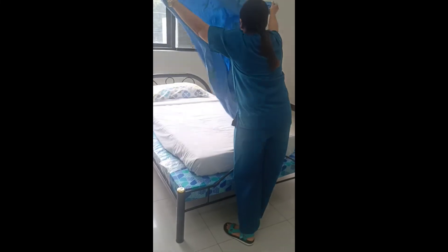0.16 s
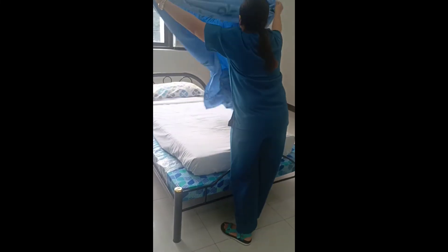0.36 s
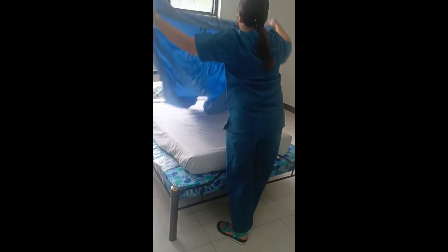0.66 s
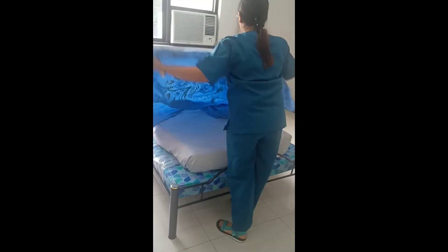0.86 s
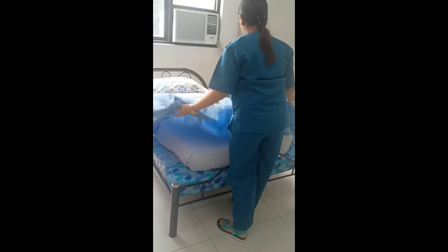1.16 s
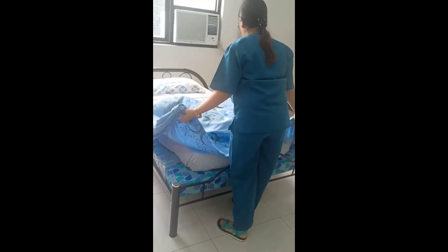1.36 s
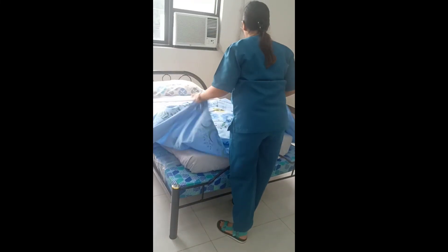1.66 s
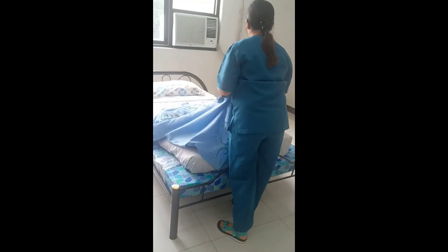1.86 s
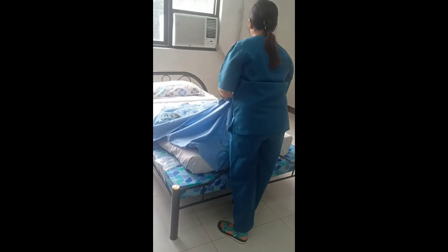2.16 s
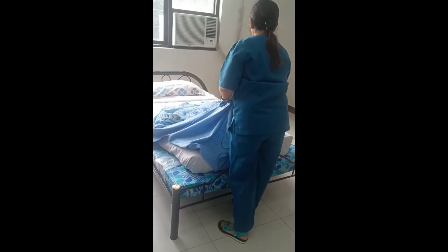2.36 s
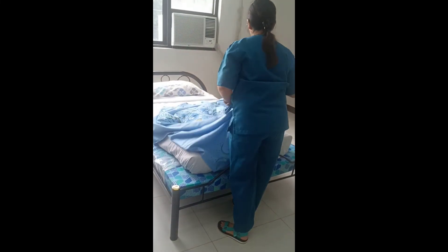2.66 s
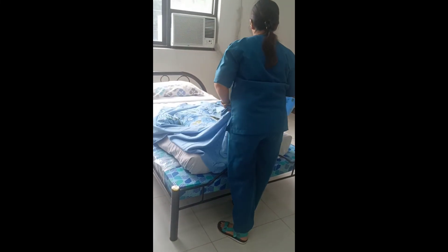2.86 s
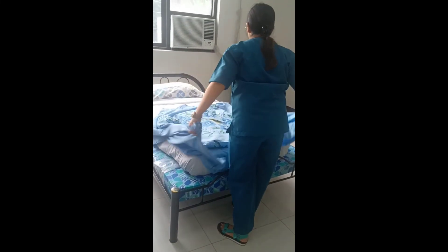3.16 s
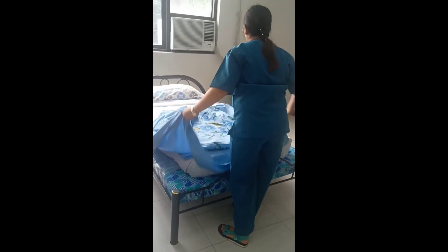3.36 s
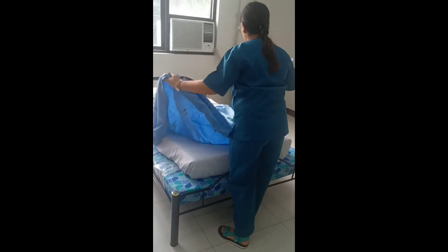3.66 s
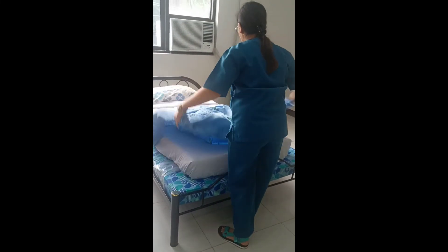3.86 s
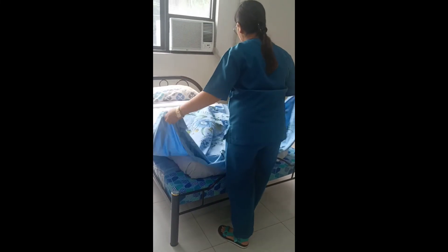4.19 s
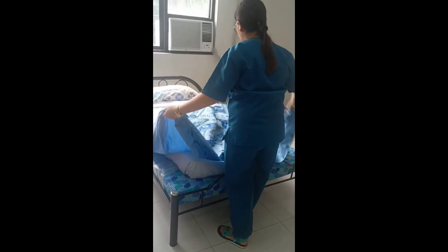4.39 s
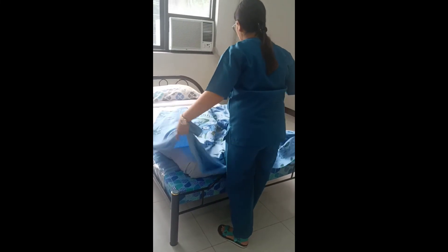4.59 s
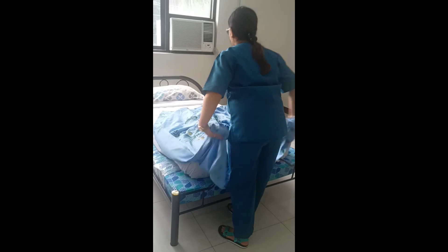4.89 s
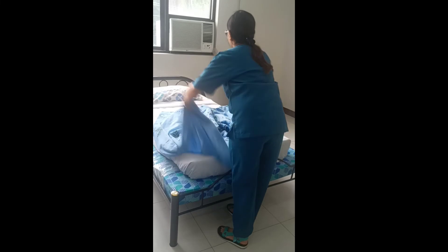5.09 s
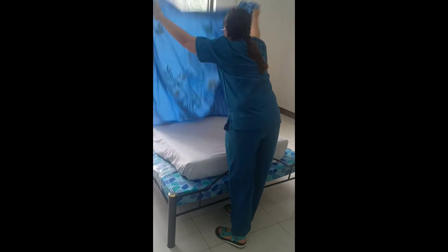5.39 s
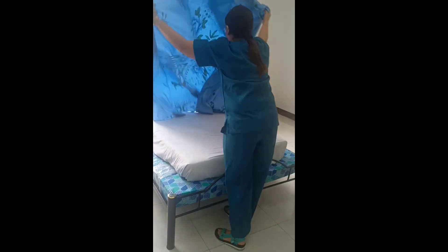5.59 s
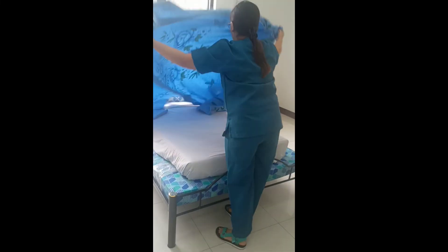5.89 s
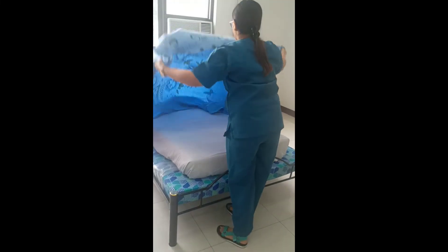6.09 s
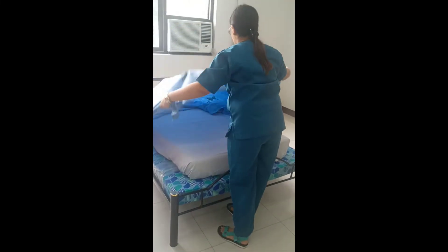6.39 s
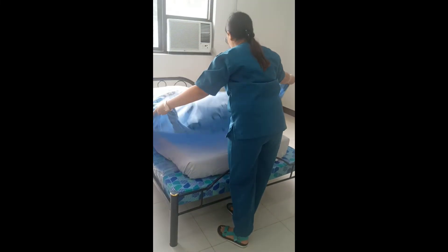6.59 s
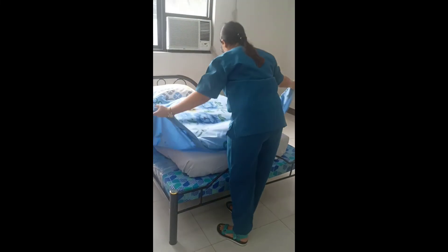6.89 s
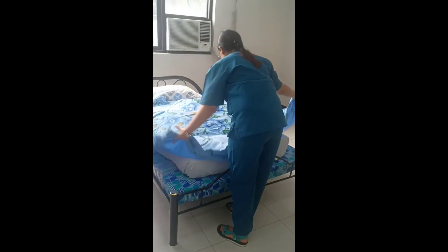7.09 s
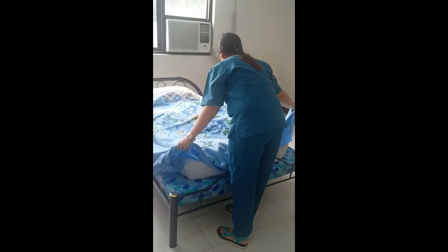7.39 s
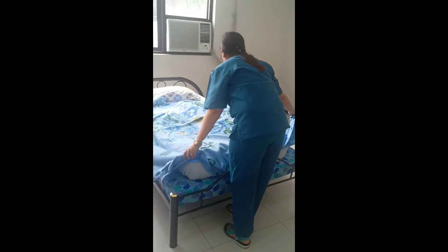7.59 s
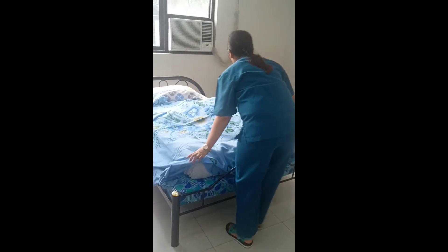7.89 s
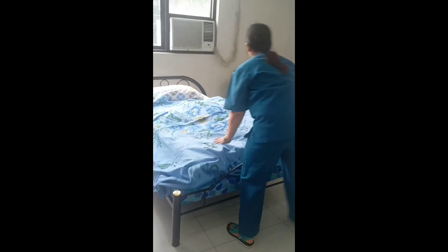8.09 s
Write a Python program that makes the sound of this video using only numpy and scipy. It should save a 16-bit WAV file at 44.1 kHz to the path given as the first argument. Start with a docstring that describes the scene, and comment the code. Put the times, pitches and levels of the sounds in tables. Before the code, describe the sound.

Four evenly spaced vibration buzzes dominate, each starting with a sharp tick and a quick rise, holding a low hum with thin bright whine, and falling away in a short rattling slide. In the gaps one hears the constant fan rush and compressor hum of an air conditioner, faint cloth hiss as a sheet is spread, small clicks and a light metal jingle. The room is small and reflective, the motor pressed against the microphone.

```python
"""In a tiled room an air conditioner drones: noise-fed room modes, fan rush and compressor multiples.
A bed sheet rustles as grainy hiss; rotor, casing and cloth tick in short noise bursts.
Something metallic clinks and a frame is bumped, both as decaying sine modes with a room tail.
A tiny unbalanced motor, pressed against the microphone's casing, runs about one second in every two:
it ticks, spins up, buzzes with a comb of shaft orders and brush hiss, and coasts down."""
import sys
import numpy as np
from scipy import signal
from scipy.fft import rfft, irfft, next_fast_len
from scipy.io import wavfile
from scipy.ndimage import uniform_filter1d, map_coordinates

SR = 44100
rng = np.random.default_rng(int(sys.argv[2]) if len(sys.argv) > 2 else 0)


def transcribe(u):
    """Save the signal u as a 16-bit wav file named by the first command-line argument.

    u: samples, shape (n,) or (channels, n), limited to [-1, 1]; the rate is SR.
    q: integer samples, one column per channel.
    """
    v = np.clip(np.atleast_2d(u).T, -1, 1)
    q = np.round(v * 32767).astype(np.int16)
    wavfile.write(sys.argv[1], SR, q)


N = 363825
TOP_HZ = 15650  # band limit

# motor current bursts: on_s, off_s, reference_level_db
CURRENT = [(.445, 1.427, -23), (2.445, 3.427, -23), (4.445, 5.427, -23), (6.445, 7.43, -23.5)]


def amp(db):
    """Gain of a level in dB."""
    return 10 ** (np.asarray(db) / 20)


def unit(x):
    """x at rms 1."""
    return x / np.sqrt(np.mean(x ** 2) + 1e-20)


def along(points, hz):
    """Interpolate (Hz, value) points on a log frequency axis."""
    point_hz, value = np.transpose(points)
    return np.interp(np.log(hz + 1), np.log(point_hz + 1), value)


def curve(rows):
    """One value per sample from rows of (s, value)."""
    point_s, value = np.transpose(rows)
    return np.interp(np.arange(N) / SR, point_s, value)


def wobble(rate_hz):
    """Smooth random curve with rate_hz knots a second."""
    knots = rng.standard_normal(int(N * rate_hz / SR) + 4)
    return map_coordinates(knots, [np.arange(N) * rate_hz / SR])


def random_phase():
    """Uniform starting phase in radians."""
    return rng.uniform(0, 2 * np.pi)


def filtered(x, response):
    """Multiply the spectrum of x by a response of frequency."""
    size = next_fast_len(len(x) + 8192)
    return irfft(rfft(x, size) * response(np.fft.rfftfreq(size, 1 / SR)), size)[:len(x)]


def rush(spectrum, patchy_db):
    """Coloured noise of rms 1 with time-frequency patches of random gain."""
    z = signal.stft(rng.standard_normal(N), nperseg=512)[2]
    field = uniform_filter1d(rng.standard_normal(z.shape), size=6, axis=0)
    field = uniform_filter1d(field, size=12, axis=1)
    noise = signal.istft(z * amp(patchy_db * unit(field)), nperseg=512)[1][:N]
    return unit(filtered(noise, lambda hz: amp(along(spectrum, hz))))


def room_tail():
    """Fresh reverberant noise of energy 1; each frequency dies at its own speed."""
    # room decay: frequency_hz, t60_s
    decay = [(1000, 0.44), (5000, 0.5), (15000, 0.045)]
    hz, t, z = signal.stft(rng.standard_normal(SR // 2), SR, nperseg=256)
    fade = amp(-60 * t / along(decay, hz)[:, None])
    tail = signal.istft(z * fade, SR, nperseg=256)[1]
    return tail / np.linalg.norm(tail)


def add(track, start_s, sound):
    """Mix a sound into the track at start_s."""
    part = track[round(start_s * SR):][:len(sound)]
    part += sound[:len(part)]


def struck(blows, modes, wet_db, grit):
    """Each blow rings the modes at new strengths; chatter roughens the ring and the room answers."""
    out, t = np.zeros(N), np.arange(SR // 2) / SR
    for start_s, blow_db in blows:
        ring = np.zeros(len(t))
        for hz, level_db, t60_s in modes:
            decay = amp(blow_db + level_db + rng.normal(0, 1.1) - 60 * t / t60_s)
            struck_hz = hz * rng.normal(1, 0.0075)
            ring += decay * np.sin(2 * np.pi * struck_hz * t + random_phase())
        ring *= 1 - np.exp(-t / 0.00067)  # onset
        ring *= 1 + grit * wobble(925)[:len(t)]
        add(out, start_s, ring)
        add(out, start_s, amp(wet_db) * signal.fftconvolve(ring, room_tail()))
    return out


def air_conditioner():
    """Fan rush, the room's low modes excited by noise and multiples of the compressor's shaft."""
    # fan rush spectrum: frequency_hz, relative_density_db (per Hz)
    fan_spectrum = [(15, -50), (45, -13), (75, -11), (125, -5), (240, -3), (320, -7.5), (500, -10),
                    (900, -16), (1100, -22.5), (1600, -21), (2500, -29), (4000, -26), (7300, -34.5),
                    (9500, -45), (13500, -41), (15900, -40)]
    # room modes under the fan: centre_hz, width_hz, level_db
    low_modes = [(124.4, 13.7, -42), (175.7, 11, -41.5), (217, 23, -49.5), (242.9, 6.7, -43.5),
                 (352.3, 23, -47.5), (491, 25, -52.5)]
    # compressor tones: multiple_of_shaft, level_db
    multiples = [(2, -47.5), (3, -43.5), (4, -49), (6, -40), (8, -46), (10, -45)]
    compressor_hz = 29.36
    angle = 2 * np.pi * np.cumsum(compressor_hz * (1 + 0.003 * wobble(1.492))) / SR
    out = np.zeros(N)
    for k, level_db in multiples:
        out += amp(level_db + wobble(5.6)) * np.sin(k * angle + random_phase())
    for centre_hz, width_hz, level_db in low_modes:
        resonance = lambda hz: 1 / (1 + ((hz - centre_hz) / width_hz * 2) ** 2)
        out += amp(level_db) * unit(filtered(rng.standard_normal(N), resonance))
    return out + amp(-35.5 + 0.69 * wobble(2.09)) * rush(fan_spectrum, patchy_db=1)


def sheet():
    """Sliding cloth: a coloured hiss whose level swells and flutters."""
    # rustle level: time_s, level_db
    rustle = [(0, -49.5), (.18, -43.5), (.42, -52.5), (1.68, -51.5), (1.82, -42.5), (2.2, -58.5),
              (2.42, -51), (3.55, -53), (3.7, -43.5), (3.88, -57), (4.2, -54), (4.27, -44), (4.41, -47.5),
              (5.7, -55), (5.99, -58), (6.26, -48), (6.4, -52.5), (7.6, -45.5), (7.86, -47.5), (8.12, -54),
              (8.25, -49)]
    # cloth spectrum: frequency_hz, relative_density_db (per Hz)
    cloth_spectrum = [(900, -40), (1500, -12), (2800, -2), (4000, -2), (5800, -5), (7500, -1.5),
                      (10000, -14), (12200, -8.5), (13800, -3), (16000, -13)]
    return amp(curve(rustle) + 1.2 * wobble(40)) * rush(cloth_spectrum, patchy_db=1)


def bumped_frame():
    """Bumps ring the frame's low, short modes."""
    # bumps: start_s, level_db
    bumps = [(.803, -40.5), (.84, -48.5), (.875, -47)]
    # frame modes: frequency_hz, relative_level_db, t60_s
    frame_modes = [(780, -4, .08), (880, -1, .12), (1080, -4, .06), (1250, 2, .14), (1480, -5, .12),
                   (1700, -11, .07), (2000, -9, .07), (2550, -8, .06)]
    return struck(bumps, frame_modes, wet_db=2.5, grit=0.95)


def metal_clinks():
    """Blows ring the high modes of something small and metallic."""
    # clinks: start_s, level_db
    clinks = [(6.005, -45), (6.03, -47), (6.055, -50), (6.08, -52), (6.12, -53)]
    # metal modes: frequency_hz, relative_level_db, t60_s
    metal_modes = [(4630, -11, .08), (5050, -4, 0.06), (5360, -2.5, 0.08), (6060, -6, .1), (6210, -10, .1),
                   (6800, -3.5, .14), (7200, -5, .08), (7900, -3, .08), (8660, -9, 0.086), (9100, -7, .08),
                   (10400, -10, .1), (11300, -7, 0.11), (11550, -8, .14), (13700, -8, .06)]
    return struck(clinks, metal_modes, wet_db=6, grit=1.06)


def ticks():
    """Millisecond cracks of decaying noise, each with its own band and share of room."""
    # ticks of rotor, casing and cloth: start_s, dry_peak_db, low_hz, high_hz, room_tail_db (re crack)
    cracks = [(.44, -23.5, 7000, 14000, 0), (.445, -20, 3500, 14000, -6), (.458, -30, 7000, 13000, -10),
              (1.62, -31, 5000, 11000, -12), (1.656, -34, 7000, 15000, -12), (2.057, -35, 11000, 16000, -6),
              (2.442, -20, 6950, 14000, -12), (2.46, -29, 7000, 15000, -10), (2.469, -20, 4500, 11000, -15),
              (3.622, -33, 6500, 9000, -12), (3.633, -33, 7000, 13000, -12), (4.24, -20.5, 3800, 16000, 7),
              (4.342, -28, 6000, 16000, -8), (4.421, -32, 6000, 15000, 1), (4.444, -13.5, 6300, 16000, 3),
              (4.447, -13.5, 6300, 16000, -5), (4.457, -21, 4000, 16000, 7), (4.474, -28, 11000, 16000, -4),
              (5.633, -21, 7500, 16000, -7), (6.005, -27, 4500, 14000, 0), (6.205, -25.5, 11500, 16000, 3),
              (6.39, -38, 11000, 16000, -1), (6.449, -25, 7500, 15000, -12),
              (6.454, -15.5, 7500, 14900, -12), (7.635, -29, 7500, 16000, -12),
              (7.81, -31, 3480, 15000, 10.5), (7.822, -30.5, 3620, 7040, 11.5)]
    out, t = np.zeros(N), np.arange(SR // 50) / SR
    for start_s, peak_db, low_hz, high_hz, tail_db in cracks:
        band = signal.butter(3, [low_hz, high_hz], "bandpass", fs=SR, output="sos")
        crack = signal.sosfilt(band, amp(-60 * t / .003) * rng.standard_normal(len(t)))
        crack *= amp(peak_db) / np.abs(crack).max()
        add(out, start_s, crack)
        tail = signal.sosfilt(band, room_tail())
        tail /= np.sqrt(2 * (high_hz - low_hz) / SR)  # make up for the energy outside the band
        add(out, start_s, amp(tail_db) * np.linalg.norm(crack) * tail)
    return out


def shaft_speed():
    """Shaft speed in Hz: each burst closes in on the free speed, then runs down without current."""
    # settling speed, drifting with load and supply: time_s, speed_hz (turns per second)
    free_speed = [(.6, 247.4), (1.05, 247.7), (1.2, 246.8), (1.4, 247.3), (2.7, 242.2), (2.98, 245.6),
                  (3.16, 244.6), (3.27, 246.6), (3.43, 244.2), (4.7, 241.6), (4.92, 242.2), (5.09, 244.4),
                  (5.43, 239.8), (6.7, 239.6), (7, 239.8), (7.32, 241.2)]
    breakaway_s = .028  # wait before the rotor turns
    spin_up_s, coast_s = .058, .13  # time constants
    t, share = np.arange(N) / SR, np.zeros(N)
    for on_s, off_s, _ in CURRENT:
        run_up = 1 - np.exp(-np.clip(t - on_s - breakaway_s, 0, None) / spin_up_s)
        run_down = np.exp(-np.clip(t - off_s, 0, None) / coast_s)
        share += run_up * run_down
    return np.maximum(share * curve(free_speed), 1)


def motor():
    """The off-centre weight shakes once a turn; brushes and bearings add overtones and hiss."""
    # shaft orders: multiple, relative_level_db (the first, the shake, is made apart)
    orders = [(1, 0), (2, -37), (3, -42), (4, -48), (5, -30), (6, -33), (7, -39), (8, -39), (9, -46),
              (10, -30), (11, -34), (12, -27), (13, -50), (14, -41), (15, -40), (16, -41), (17, -51),
              (18, -43), (19, -39), (20, -35), (21, -42), (22, -30), (23, -27), (24, -31), (25, -38),
              (26, -41), (27, -37), (28, -45), (29, -36), (30, -31), (31, -33), (32, -32), (33, -33),
              (34, -28), (35, -37), (36, -33), (37, -36), (38, -38), (39, -40), (40, -37), (41, -46),
              (42, -39), (43, -43), (44, -34), (45, -36), (46, -33), (47, -34), (48, -33), (49, -40),
              (50, -42), (51, -39), (52, -44), (53, -36), (54, -36), (55, -44), (56, -36), (57, -34),
              (58, -41), (59, -42), (60, -45), (61, -47), (62, -33), (63, -50)]
    # brush hiss spectrum: frequency_hz, relative_density_db (per Hz)
    brush_spectrum = [(900, -120), (1500, -3), (3000, -9), (5500, -2), (6750, -7.5), (7700, 0.5),
                      (10000, -7), (12000, -4), (13800, -2), (16000, -8.5)]
    # casing colour: frequency_hz, gain_db
    casing = [(200, 0), (1200, 0), (2100, 2), (2900, 0), (4300, -8), (5300, 0), (6100, 2), (6750, -9),
              (7500, 0), (8300, 1), (10000, -4), (11500, -1), (12700, -5), (13800, 0), (16000, 0)]
    full_hz = 245
    t, speed = np.arange(N) / SR, shaft_speed()
    slack = np.clip(1 - speed / full_hz, 0, 1) ** .5  # below full speed the rotor runs loose in its bearings
    angle = 2 * np.pi * np.cumsum(speed) / SR
    play = (.0007 + .045 * slack ** 1.3) * wobble(300)  # shaft angle jitter, rad
    out, hiss = np.zeros(N), rush(brush_spectrum, patchy_db=3.0)
    for on_s, off_s, reference_db in CURRENT:
        span = slice(round(on_s * SR), round((off_s + 0.22) * SR))
        u, turn, turn_hz = t[span], angle[span], speed[span]
        octaves = np.log2(turn_hz / full_hz)
        since_off_s = u - off_s
        edges = np.clip((u - on_s) / 0.014, 0, 1) * np.clip((off_s + 0.21 - u) / .03, 0, 1)

        # shaking force grows with speed and drops when the current is cut
        coasting = np.clip(since_off_s / 0.098, 0, 1)
        shake = amp(reference_db + 3.0 + 9.7 * octaves - 2 * coasting) * np.sin(turn)

        whine = np.zeros(len(u))
        for k, level_db in orders[1:]:
            # away from full speed an overtone meets another part of the casing's colour
            moved_db = along(casing, k * turn_hz) - along(casing, k * full_hz)
            gain = amp(level_db + moved_db + rng.normal(0, 1) + wobble(4.06)[span])
            gain = gain * (k * turn_hz < TOP_HZ)
            whine += gain * np.sin(k * (turn + play[span]) + random_phase())
        whine *= amp(reference_db + 3.5 + 8 * octaves - 12 * np.clip(since_off_s / .018, 0, 1))

        # loose rotor rattles twice a turn; flares when the current is cut, then fades
        beat = np.exp(.5 * np.cos(2 * turn))
        released_db = (u > off_s) * (9 - 26 * np.clip(since_off_s / 0.14, 0, 1))
        rattle_db = reference_db - 35 + 20 * np.minimum(slack[span], .7) + released_db
        rattle = amp(rattle_db) * beat * hiss[span]
        out[span] = edges * (shake + whine + rattle)
    return out


def scene():
    """All sources at one microphone."""
    background = air_conditioner() + sheet()
    hits = bumped_frame() + metal_clinks() + ticks()
    return (background + hits + motor())[None]


def record(dry):
    """The microphone drops the deepest bass; nothing is kept above the band limit."""
    response = lambda hz: (hz < TOP_HZ) / (1 + (42 / (hz + 1)) ** 3.9)
    return filtered(dry[0], response)[None]


dry = scene()
out = record(dry)
transcribe(out)
```